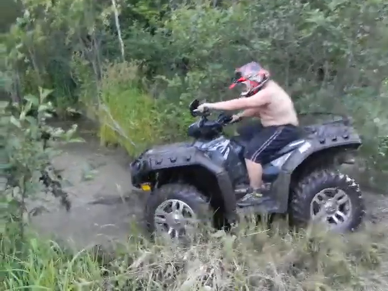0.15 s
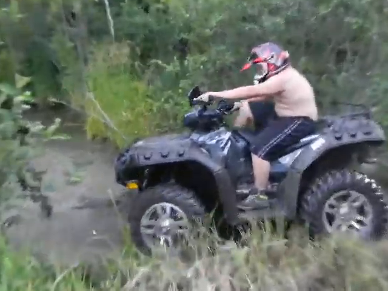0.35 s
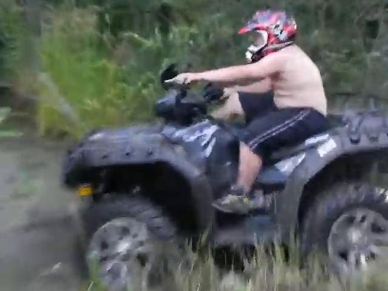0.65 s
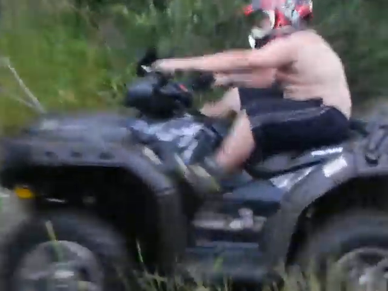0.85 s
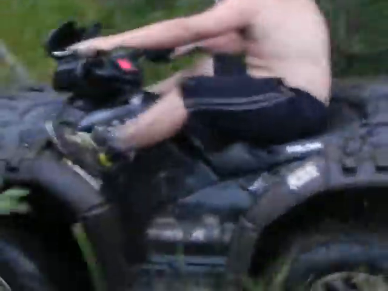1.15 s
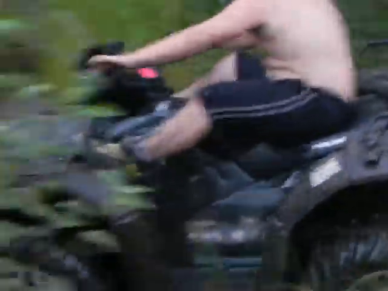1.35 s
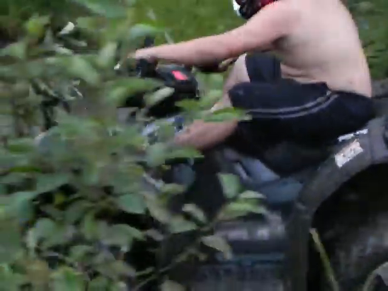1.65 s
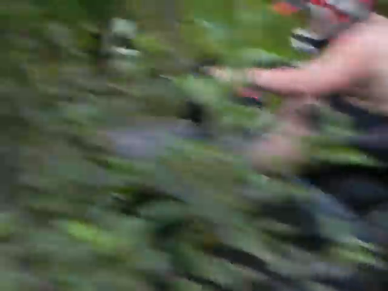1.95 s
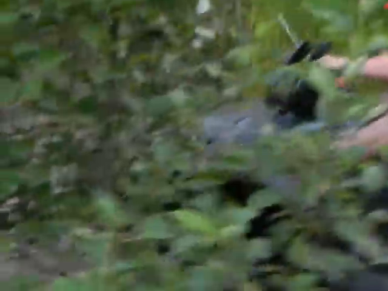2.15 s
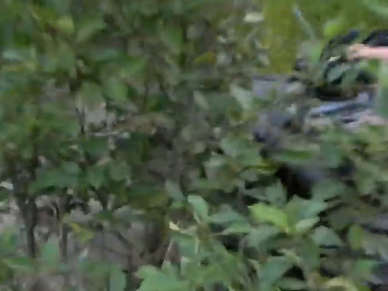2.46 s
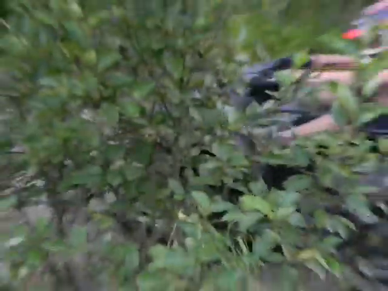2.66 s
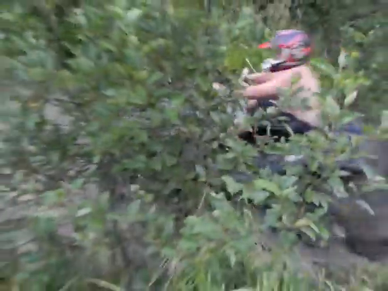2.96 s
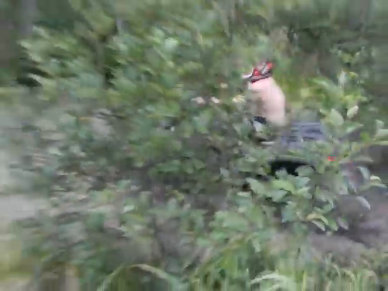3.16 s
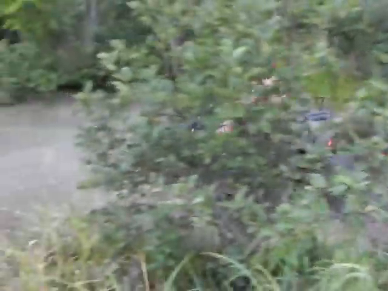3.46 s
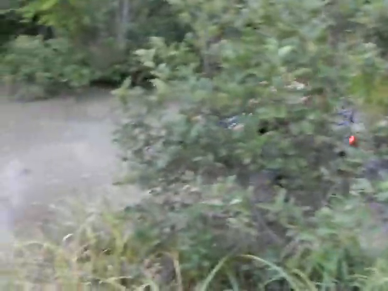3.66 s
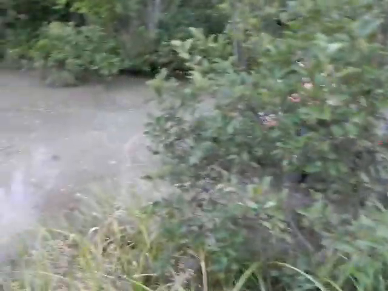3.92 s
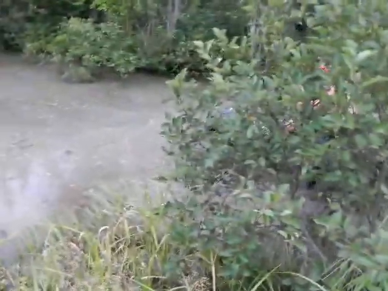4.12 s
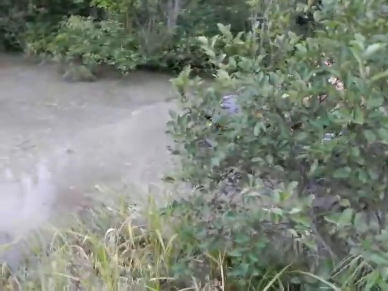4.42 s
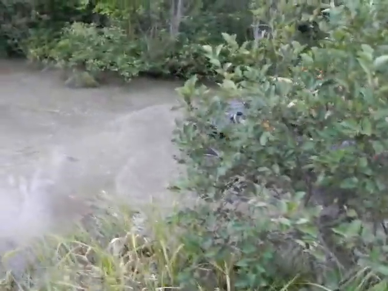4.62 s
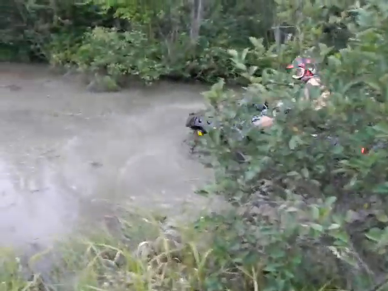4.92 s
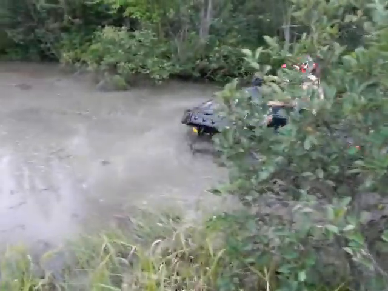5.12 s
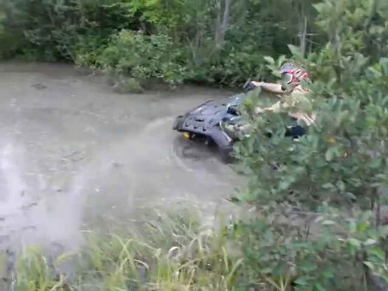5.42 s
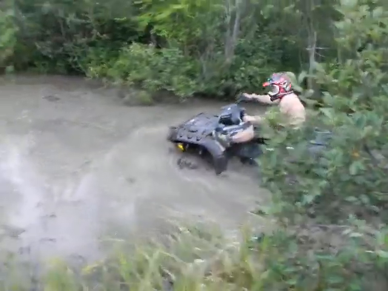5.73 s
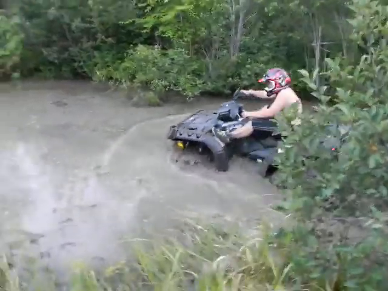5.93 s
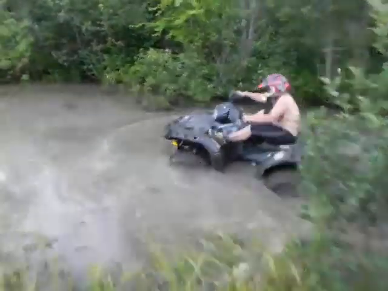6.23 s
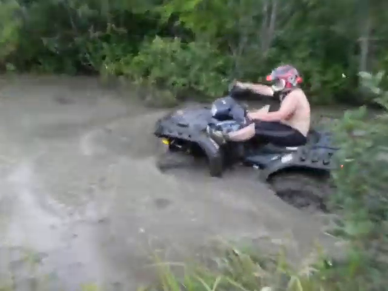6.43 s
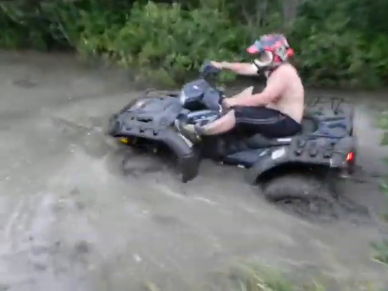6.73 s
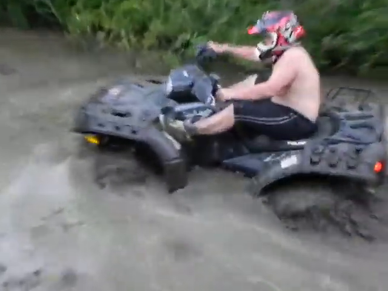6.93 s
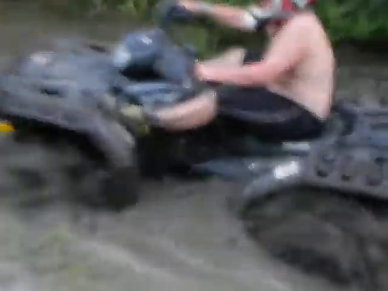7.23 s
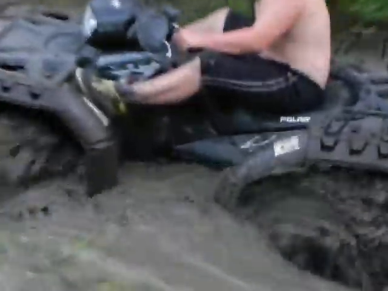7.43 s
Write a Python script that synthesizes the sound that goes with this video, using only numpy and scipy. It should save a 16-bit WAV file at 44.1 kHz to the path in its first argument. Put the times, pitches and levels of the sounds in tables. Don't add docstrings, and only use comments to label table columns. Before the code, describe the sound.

Close, lumpy quad bike engine revs up and down in a mud hole, briefly overloading the microphone, then holds throttle and climbs to a cleaner note.

```python
import sys
import numpy as np
from scipy import signal
from scipy.io import wavfile
from scipy.ndimage import uniform_filter1d

SR = 44100
rng = np.random.default_rng(int(sys.argv[2]) if len(sys.argv) > 2 else 0)


def bounce(signal):
    frames = np.transpose(np.atleast_2d(signal))
    limited = np.clip(frames, -1, 1)
    pcm = np.round(limited * 32767).astype(np.int16)
    wavfile.write(sys.argv[1], SR, pcm)


def rack_gain(trim_db):
    fader = np.asarray(trim_db, float)
    return 10 ** (fader / 20)


N = 334278
TIME = np.arange(N) / SR

# start_s, closest_s, end_s
ZOOMS = [
    (.5, 1.3, 2.05),
    (2.55, 3.45, 4.15),
    (6.35, 7.5, 8.6),
]
# roar_lift_db, clatter_change_db
ZOOM_GAINS = [
    (4, -3),
    (7, -7),
    (5.5, -8.5),
]
# hz, left_right_likeness [0-1]
MIC_LIKENESS = [(200, 0.63), (500, 0.18), (1000, 0.3), (2500, 0.57), (6000, 0.38), (15000, 0.9)]
# hz, left_lead_rad
MIC_LEAD = [(0, 0), (260, -.2), (520, -1.6), (1200, -1.3), (1900, -.9), (2800, .1), (5200, -.2),
            (16200, .1)]
# hz, left_minus_right_db
MIC_LEAN = [(60, -5), (180, -15.5), (550, 7), (1650, -3), (4970, -1.5), (15000, -2)]
# start_s, length_ms
WRAPS = [(1.63764, 0.7), (1.66959, 0.39), (1.74787, 0.02), (1.74798, 0.59), (1.88794, 0.02),
         (1.88814, 0.05), (1.97868, 0.07), (1.97898, 0.02), (1.97914, 0.05), (2.82363, 0.11),
         (3.51497, 1.07), (3.54363, 1.25), (3.5924, 0.82), (3.61921, 0.84), (3.66372, 0.29),
         (3.88893, 1.02), (3.91456, 0.66), (3.9746, 0.14), (4.07147, 0.54)]
NOTCH_HZ, NOTCH_RISE_HZ, NOTCH_WIDE_DB, NOTCH_ZOOM_DB, NOTCH_ONSET = 1410, 587, -2.5, 14, 5.5

# hz, level_db_per_hz
CLATTER_SPECTRUM = [(250, -71), (450, -4.5), (900, -13), (1500, -17.5), (2000, -2.5), (2600, -1.5),
                    (3200, -7), (4300, -9.5), (5500, -18.5), (9000, -45)]
ROAR_SPECTRUM = [(150, -25), (300, -6), (400, 8), (540, -6), (700, -2.5), (850, -6), (1050, -6),
                 (1450, -7.5), (1800, -7.5), (2700, -18.5), (4500, -31), (6000, -41)]
FIZZ_SPECTRUM = [(3000, -10.5), (5500, -2), (7000, -2), (9000, -5), (12000, -14.5), (15600, -17.5),
                 (16100, -43)]
# time_s, level_db
CHURN = [(0.0, -44.5), (0.19, -49.5), (0.55, -50), (0.74, -51), (1.01, -51.5), (1.37, -47), (1.54, -45.5),
         (1.71, -48), (2.07, -50.5), (2.53, -48), (2.85, -50.5), (3.04, -53.5), (3.5, -48), (3.65, -58),
         (4.73, -51), (5.55, -55), (6.99, -53.5), (7.58, -57)]
CHURN_MEAN_DB = -51
CLATTER_DB, CLATTER_PER_CHURN, ROAR_DB, ROAR_PER_CHURN = -37, 1.24, -32, 0.21
COAST_ZOOM_ROAR_DB = 3
# start_s, level_db, length_s
RATTLES = [
    (.075, -33, 0.028),
    (.4225, -25.5, 0.0094),
    (.495, -33, 0.034),
    (1.61, -32.5, 0.041),
    (1.955, -35, 0.029),
    (2.05, -36, 0.011),
    (3.87, -32, 0.039),
    (4.05, -30, 0.0088),
]

# start_s, goal_cycles_per_s, time_constant_s
SPEED_GOALS = [(0.0, 49.91, 0.9), (0.313, 8.19, 0.134), (0.484, 35.58, 0.339), (0.76, 21.44, 0.438),
               (0.855, -3.0, 0.831), (1.527, 26.17, 0.811), (1.744, -0.92, 0.645), (1.918, 59.99, 0.892),
               (2.106, 66.97, 0.601), (2.187, 22.32, 0.083), (2.296, 72.46, 0.896), (2.543, 21.18, 0.14),
               (2.826, 41.57, 0.415), (2.99, 4.81, 0.478), (3.521, 22.66, 0.899), (3.707, 10.68, 0.095),
               (3.846, 63.98, 0.872), (4.243, 3.38, 0.335), (4.35, 37.43, 0.369), (4.575, 17.92, 0.198),
               (4.827, 33.76, 0.384), (4.95, 27.78, 0.409), (5.075, 17.6, 0.368), (5.183, 23.81, 0.083),
               (5.545, 19.23, 0.184), (5.877, 29.52, 0.2), (6.427, 17.63, 0.29), (6.705, 61.85, 0.9),
               (7.247, 43.54, 0.08), (7.427, 63.23, 0.584)]
START_CYCLES_PER_S, THUMB_S = 9.75, .05
FIRST_CYCLE, SECOND_CYLINDER = -.11, .37
# start_s, end_s, exhaust_db, fade_by_end_db, second_minus_first_db
PULLS = [(0.088, 0.302, -5.5, -4.5, 2.5), (0.513, 1.06, -6.5, -3.5, 2.5), (1.634, 1.682, -3, 0.5, -.1),
         (1.728, 1.765, -7, -1.5, 4), (1.868, 1.9, -5.5, -0.5, 6), (1.95, 2.205, -2.5, -5, 0),
         (2.247, 2.62, -8, -1.5, .4), (2.793, 3.02, -11.5, 1.5, 5.5), (3.512, 3.722, -2.5, -1, -0.5),
         (3.887, 4.24, -3, -7.5, 1.5), (4.35, 4.555, -9.5, -0.3, 4), (4.623, 5.047, -9, -0.5, 2.5),
         (5.12, 6.545, -8, -1.2, 1), (6.564, 7.6, -9, 2, 2)]
SECOND_RISE_DB, KICK_DB, KICK_S = -1.5, 1, 0.036
COAST_DB, COAST_DB_PER_SPEED, COAST_SECOND_DB, COAST_SCATTER_DB = -7.5, -0.225, 3., 1.5
COAST_TRIMS = [-4.5, -1.2, .5, -1, -0.8, -5, -10, 0, 0, -3, -1.5, 0, -2.5, -1, .1]
BITE_DB, BITE_DB_PER_SPEED, BITE_KICK_DB = 1.4, 0.3, 6
RASP_DB, RASP_DB_PER_SPEED, RASP_ZOOM_DB, RASP_BUILD_DB, RASP_BUILD_S = 3, 0.04, -7.5, 2.5, 0.36
BLAST_DB, BLAST_KICK_DB, BLAST_BARED_DB, BLAST_KNEE = -16, 6, 27, 5.8

# hz, width_hz, level_db
BOOM_MODES = [(117.1, 23, -9), (140.2, 25.8, -7.5)]
BITE_MODES = [(196, 14.7, -11.5), (240, 29, -19.5)]
RASP_MODES = [(372.2, 37, -14.5), (517, 82, -23), (695, 65, -26), (1400, 210, -16.5)]
PUFF_MODES = [(54.7, 23, -13), (88.5, 84, -16), (119.6, 10, 2), (130.8, 24, -2), (213, 61, -0.5)]
# hz, width_hz, level_db
THROAT_MODES = [(519, 54, -28.5), (640, 80, -20.5), (1283, 105, -25)]
FAST, THROAT_KNEE, MUFFLER_KNEE = 30, 2, 4.4
MUFFLER_HZ, MUFFLER_WIDTH_HZ, MUFFLER_SHARE, MUFFLER_HEAT = 73., 24, 0.79, .8
# multiple_of_cycle_rate, level_db
FLOW_HARMONICS = [(1, -16.5), (2, -5), (3, 0.5), (4, -16.5), (5, -1), (6, -4.5), (7, -20), (8, -10),
                  (9, -12), (10, -17), (11, -20), (12, -34)]
# hz, gain_db
FLOW_COLOUR = [(40, 2.5), (95, -1.4), (135, 3), (200, -1), (270, -2.5), (345, .5), (400, -13), (450, -24)]
FLOW_DB, FLOW_FROM, FLOW_FULL, FLOW_SECOND = -13.5, 28.5, 35., 0.43
FLOW_DELAY_S, FLOW_LAG_RAD = .0022, .7


def evened(x):
    return x / np.sqrt(np.mean(x ** 2) + 1e-20)


def read(points, hz):
    f, value = np.transpose(points)
    return np.interp(np.log(hz + 1), np.log(f + 1), value)


def zoom(t):
    return np.array([np.sin(np.pi / 2 * np.interp(t, row, [0, 1, 0])) for row in ZOOMS])


def closeness(t):
    return zoom(t).sum(axis=0)


def throttle_open(t):
    return np.any([(t > row[0]) & (t < row[1]) for row in PULLS], axis=0)


def speed(t):
    per_s = np.full(N, START_CYCLES_PER_S)
    for s, goal, lag_s in SPEED_GOALS:
        at = round(s * SR)
        per_s[at:] = goal + (per_s[at] - goal) * np.exp(-(TIME[at:] - s) / lag_s)
    per_s = uniform_filter1d(per_s, size=int(THUMB_S * SR), mode="nearest")
    return np.interp(t, TIME, per_s)


def zoom_db(hz, t):
    close = closeness(t)
    notch_hz = NOTCH_HZ + NOTCH_RISE_HZ * close ** 2
    depth_db = NOTCH_WIDE_DB + NOTCH_ZOOM_DB * np.tanh(NOTCH_ONSET * close ** 2)
    dips = 0
    for centre_hz, width_hz, share in [(notch_hz, 410, 1), (5570, 600, 0.54), (458, 83, 1.4)]:
        dips = dips + share * np.exp(-((hz[:, None] - centre_hz) / width_hz) ** 2)
    return -depth_db * dips


def hiss(spectrum, patchy_db):
    frames, hz = N // 256 + 5, np.fft.rfftfreq(1024, 1 / SR)
    a, b, c, d, patches = rng.standard_normal((frames, 513, 5)).T
    patches = uniform_filter1d(patches, size=10, axis=0)
    patches = evened(uniform_filter1d(patches, size=10, axis=1))
    same = np.clip(read(MIC_LIKENESS, hz), -1, 1)[:, None]
    left = a + 1j * b
    right = same * left + np.sqrt(1 - same ** 2) * (c + 1j * d)
    right = right * np.exp(-1j * read(MIC_LEAD, hz))[:, None]
    lean = rack_gain(read(MIC_LEAN, hz) / 2)[:, None]
    level_db = read(spectrum, hz)[:, None] + patchy_db * patches
    level_db = level_db + zoom_db(hz, np.arange(frames) * 256 / SR)
    z = np.array([left * lean, right / lean]) * rack_gain(level_db)
    return evened(signal.istft(z, nperseg=1024, noverlap=768)[1][:, :N])


def splashes(per_s=500, spread_db=4.0):
    size = rack_gain(spread_db * np.minimum(rng.exponential(1, (2, N)), 4))
    size = size * (rng.random((2, N)) < per_s / SR)
    kind, out = rng.integers(0, 12, (2, N)), np.zeros((2, N))
    for k, hz in enumerate(np.geomspace(5500, 14000, 12)):
        t = np.arange(int(4 * SR / hz)) / SR
        ping = np.sin(2 * np.pi * hz * t) * np.hanning(len(t))
        out += signal.oaconvolve(size * (kind == k), ping[None], axes=1)[:, :N]
    return evened(out)


def noise_db():
    churn_s, churn_db = np.transpose(CHURN)
    fizz = np.interp(TIME, churn_s, churn_db)
    swing = fizz - CHURN_MEAN_DB
    lift, drop = np.transpose(ZOOM_GAINS) @ zoom(TIME) ** 2
    coasting = uniform_filter1d(1. - throttle_open(TIME), size=8000)
    clatter = CLATTER_DB + CLATTER_PER_CHURN * swing + drop
    roar = ROAR_DB + ROAR_PER_CHURN * swing + lift
    roar = roar + COAST_ZOOM_ROAR_DB * closeness(TIME) ** 2 * coasting
    return clatter, roar, fizz


def rattles():
    humps = np.zeros(N)
    for s, db, length in RATTLES:
        humps += rack_gain(db) * np.exp(-((TIME - s - length / 2) / length * 2) ** 2)
    return humps


def noises(throb):
    clatter_db, roar_db, fizz_db = noise_db()
    rattle = rattles()
    clatter = (rack_gain(clatter_db - 0.5) * (1 + 0.64 * throb) + rattle) * hiss(CLATTER_SPECTRUM, 2.0)
    roar = (rack_gain(roar_db) * (1 + 0.61 * throb) + .5 * rattle) * hiss(ROAR_SPECTRUM, 1.53)
    water = hiss(FIZZ_SPECTRUM, 3.0) + 0.14 * splashes()
    fizz = (rack_gain(fizz_db + 1.0) * (1 + 0.54 * throb) + 0.4 * rattle) * water
    return clatter + roar + fizz


def ring(x, modes, stretch):
    out = np.zeros(N)
    for hz, width_hz, db in modes:
        turn = np.exp(2j * np.pi * np.cumsum(hz * stretch) / SR)
        decay = np.exp(-np.pi * width_hz / SR)
        out += rack_gain(db) * (turn * signal.lfilter([1], [1, -decay], x / turn)).imag
    return out


def soften(x, ms):
    hump = np.hanning(int(ms * SR / 1000) + 3)
    return signal.oaconvolve(x, hump / hump.sum())[:N]


def strokes():
    cycles = FIRST_CYCLE + np.cumsum(speed(TIME)) / SR
    count = np.arange(-1, int(cycles[-1]) + 1)
    s = np.interp(np.c_[count, count + SECOND_CYLINDER].ravel(), cycles, TIME)
    for when, ms in WRAPS:
        s[np.argmin(abs(s - when + .0016))] = when + ms / 2000 - .002
    second = np.tile([0, 1], len(count))
    return s, second, throttle_open(s)


def effort(s, fired):
    pulls_begun = np.searchsorted([row[0] for row in PULLS], s)
    start, end, pull_db, fade_db, second_db = np.array(PULLS)[np.maximum(pulls_begun - 1, 0)].T
    held_s = np.maximum(s - start, 0)
    along = np.clip((s - start) / (end - start), 0, 1)
    kick = np.exp(-held_s / KICK_S)
    per_s = speed(s)
    trim_db = np.take(COAST_TRIMS, pulls_begun) + COAST_SCATTER_DB * rng.standard_normal(len(s))
    coast_db = COAST_DB + COAST_DB_PER_SPEED * (per_s - 14) + trim_db
    level = np.where(fired, pull_db + fade_db * along + KICK_DB * kick, coast_db)
    second = np.where(fired, second_db + SECOND_RISE_DB * (along - .5), COAST_SECOND_DB)
    bite = BITE_DB + BITE_DB_PER_SPEED * (per_s - 24) + BITE_KICK_DB * kick
    rasp = RASP_DB + RASP_DB_PER_SPEED * (per_s - 24) + RASP_ZOOM_DB * closeness(s)
    rasp = rasp + RASP_BUILD_DB * np.tanh(held_s / RASP_BUILD_S)
    rush = np.maximum(per_s - FAST, 0) / BLAST_KNEE
    blast = BLAST_DB + BLAST_KICK_DB * kick + BLAST_BARED_DB * rush * np.exp(1 - rush)
    return level, second, bite, rasp, blast


def muffle(x):
    per_s = speed(TIME)
    chamber_hz = MUFFLER_HZ * (per_s / 24) ** MUFFLER_HEAT
    turn = np.exp(2j * np.pi * np.cumsum(chamber_hz) / SR)
    decay = np.exp(-np.pi * MUFFLER_WIDTH_HZ / SR)
    band = 2 * (turn * signal.lfilter([1 - decay], [1, -decay], x / turn)).real
    bypass = np.exp(-(np.maximum(per_s - FAST, 0) / MUFFLER_KNEE) ** 2)
    return x - MUFFLER_SHARE * bypass * band


def flow(pipe):
    per_s = speed(TIME)
    cycles = FIRST_CYCLE + np.cumsum(per_s) / SR - FLOW_DELAY_S * per_s
    ramp = np.clip((per_s - FLOW_FROM) / (FLOW_FULL - FLOW_FROM), 0, 1)
    share = np.sin(np.pi / 2 * ramp) ** 2
    clean = np.zeros(N)
    for k, db in FLOW_HARMONICS:
        k = round(k)
        pair_rad = np.angle(1 + FLOW_SECOND * np.exp(-2j * np.pi * k * SECOND_CYLINDER))
        level = rack_gain(FLOW_DB + db + read(FLOW_COLOUR, k * per_s))
        clean += level * np.cos(2 * np.pi * k * cycles + pair_rad - FLOW_LAG_RAD)
    return (1 - share) * pipe + share * clean


def exhaust(s, second, fired, heat=0.24):
    level_db, second_db, bite_db, rasp_db, blast_db = effort(s, fired)
    chance_db, chance_s = (rng.standard_normal((len(s), 2)) * [.4, 6e-5]).T
    db = level_db + chance_db
    rush = np.maximum(speed(s) - FAST, 0)
    at = np.clip((s - .0021 + chance_s) * SR, 0, N - 1).astype(int)
    blows, bites, rasps, blasts, puffs = np.zeros((5, N))
    blows[at] = fired * rack_gain(db + second * (second_db - 0.46 * rush) - 0.42 * rush + 10.0)
    bites[at] = blows[at] * rack_gain(bite_db + .5 * rush - 9.0)
    rasps[at] = blows[at] * rack_gain(rasp_db - 10)
    blasts[at] = fired * rack_gain(db + blast_db + 2.23 * rush - 23.0 * second - 30.5)
    puffs[at] = ~fired * rack_gain(db + second * second_db - 2.5)
    late = (at[:-2:2] + 2 * SECOND_CYLINDER * np.diff(at[::2])).astype(int)
    puffs[late] = puffs[at[:-2:2]] * rack_gain(-2)

    per_s = speed(TIME)
    stretch = (per_s / 24) ** heat
    rings = ring(soften(blows, 4.32), BOOM_MODES, stretch)
    rings += ring(soften(bites, 1.72), BITE_MODES, stretch)
    rings += ring(soften(rasps, 0.97), RASP_MODES, stretch)
    throat = np.tanh(np.maximum(per_s - FAST, 0) / THROAT_KNEE)
    howl = ring(soften(blows * throat, 0.6), THROAT_MODES, stretch)
    suction = 0.59 * soften(blows, 4.43) * 60
    blast = np.r_[np.zeros(75), soften(blasts, 4.6) * 100][:N]
    firing = np.r_[np.zeros(48), rings][:N] + blast - suction
    puffing = ring(soften(puffs, 4.94), PUFF_MODES, stretch ** 0.16)
    throb = soften(blows > 0, 14.7) * 200
    return flow(muffle(firing)) + howl + puffing, throb


def scene():
    pipe, throb = exhaust(*strokes())
    ports = np.array([rack_gain(1.27) * pipe, rack_gain(-1.0) * np.roll(pipe, 6)])
    return ports + noises(throb)


def overflow(left):
    flip = np.zeros(N)
    for s, ms in WRAPS:
        first = int(s * SR)
        at = slice(first, first + max(round(ms * SR / 1000 - .7), 1))
        flip[at] = -1 + np.abs(left[at] - left[first]) - left[at]
    return signal.lfilter(*signal.butter(4, 12500., fs=SR), flip)


def roll_off(x):
    return signal.sosfilt(signal.butter(12, 16100, fs=SR, output="sos"), x)


def record(dry):
    x = signal.lfilter(*signal.butter(3, 38., "high", fs=SR), dry)
    x = x / (1 + np.abs(x) ** 6) ** (1 / 6)
    mix = x + overflow(x[0]) * [[1], [0]]
    return roll_off(mix)


dry = scene()
out = record(dry)
bounce(out)
```